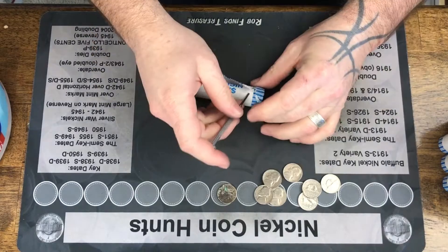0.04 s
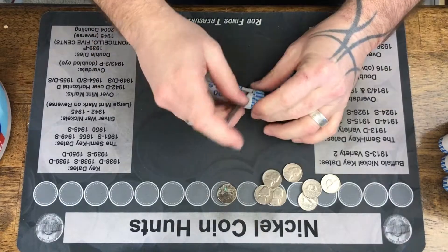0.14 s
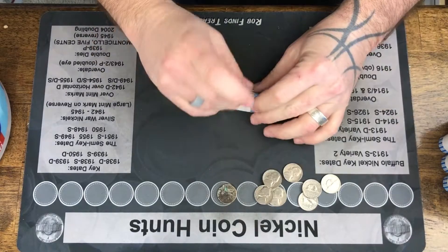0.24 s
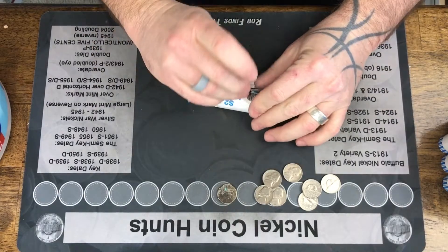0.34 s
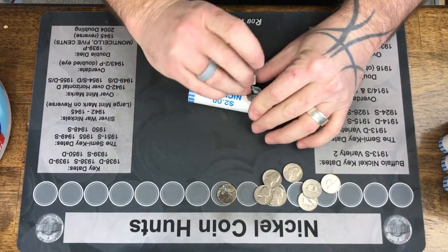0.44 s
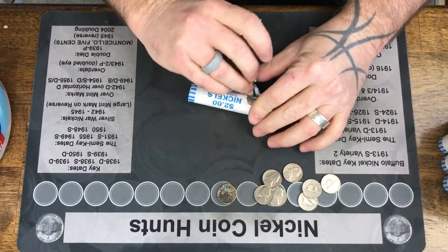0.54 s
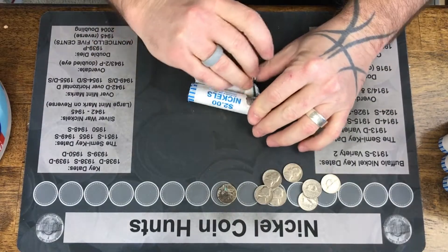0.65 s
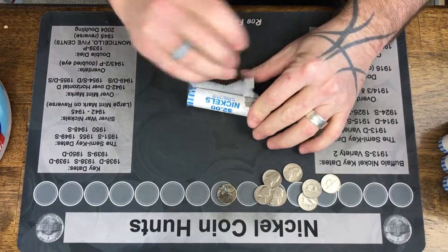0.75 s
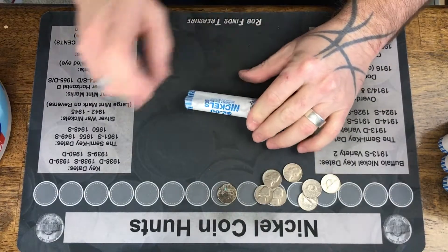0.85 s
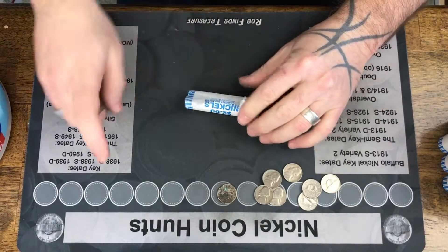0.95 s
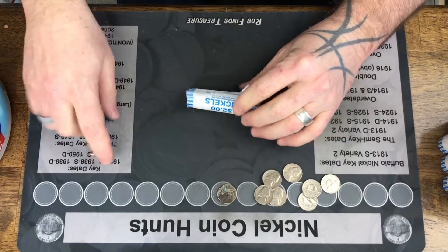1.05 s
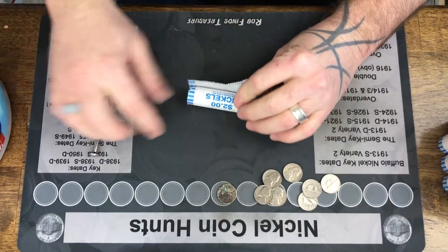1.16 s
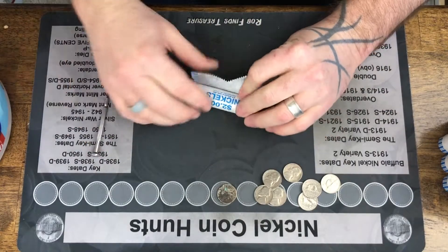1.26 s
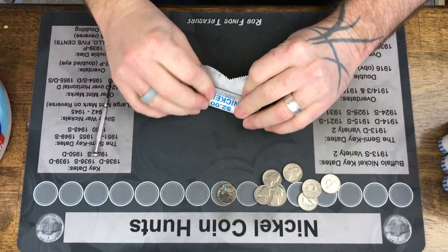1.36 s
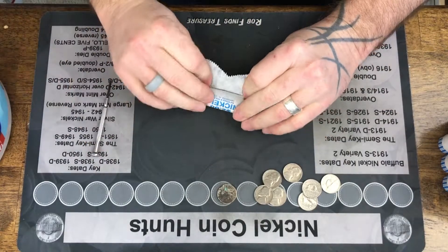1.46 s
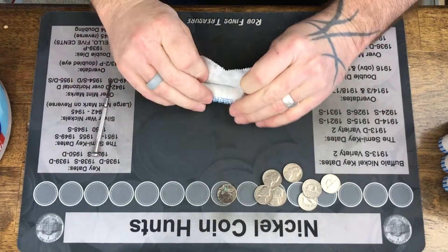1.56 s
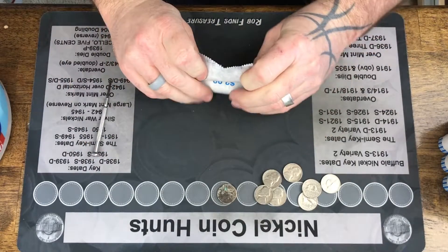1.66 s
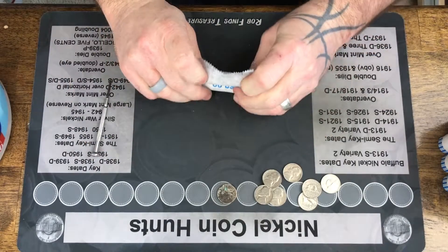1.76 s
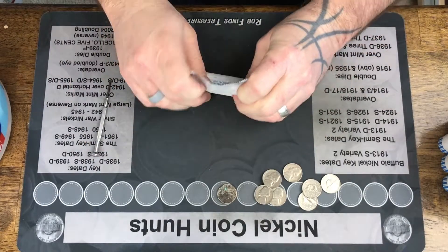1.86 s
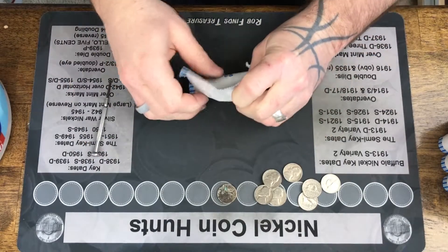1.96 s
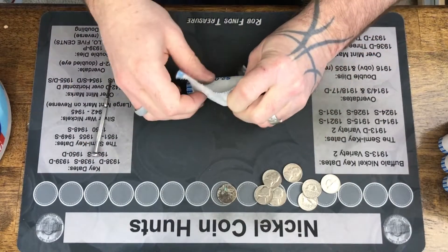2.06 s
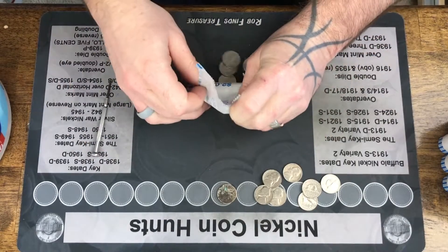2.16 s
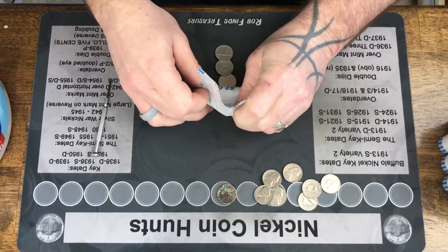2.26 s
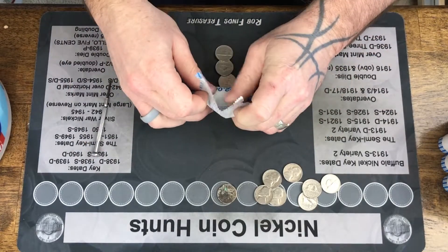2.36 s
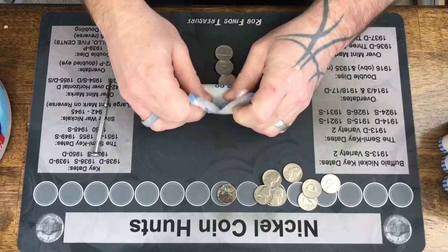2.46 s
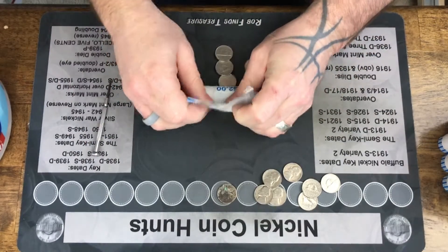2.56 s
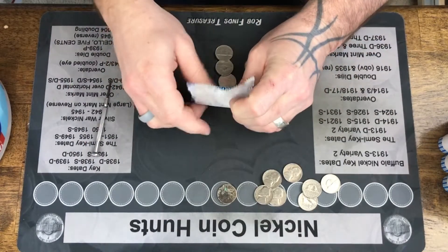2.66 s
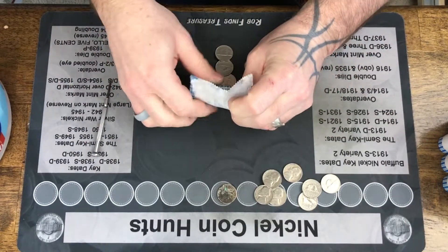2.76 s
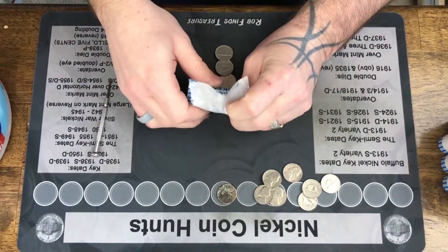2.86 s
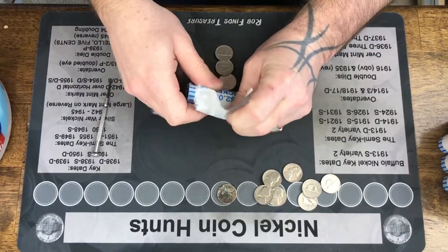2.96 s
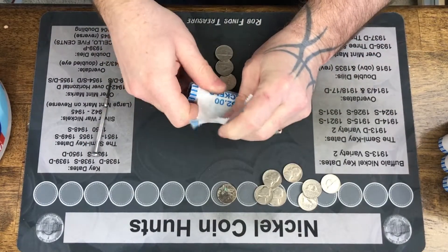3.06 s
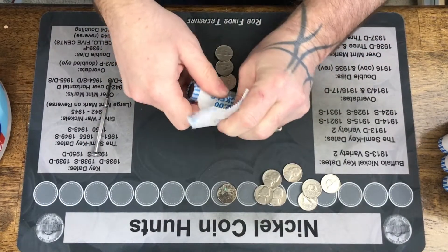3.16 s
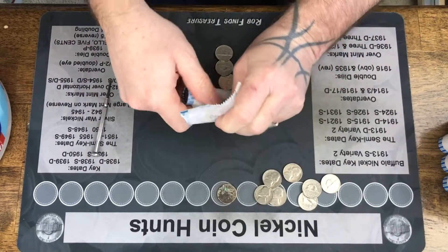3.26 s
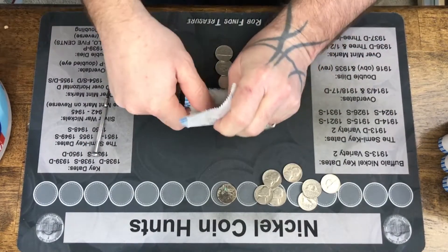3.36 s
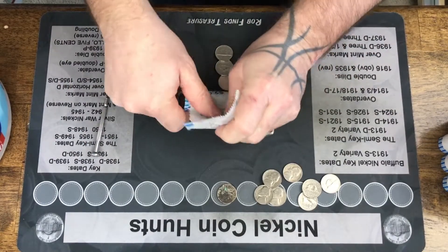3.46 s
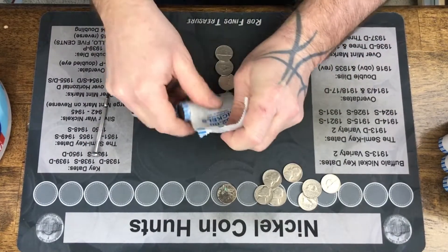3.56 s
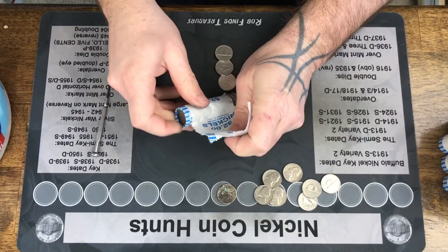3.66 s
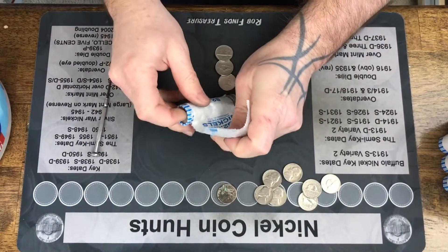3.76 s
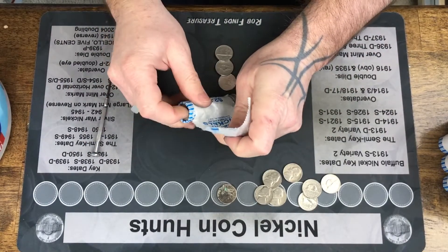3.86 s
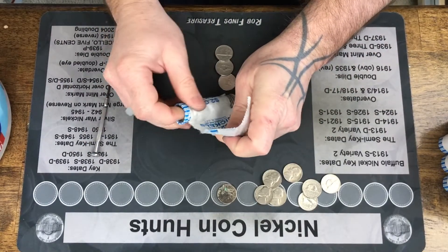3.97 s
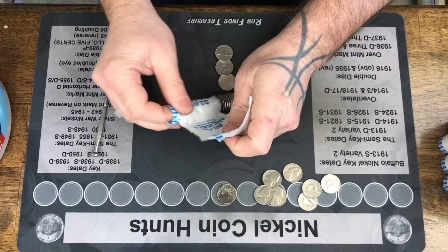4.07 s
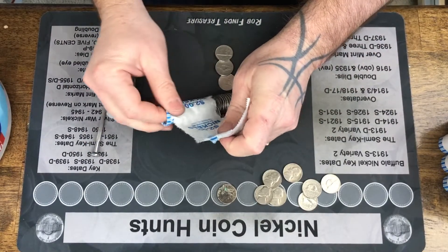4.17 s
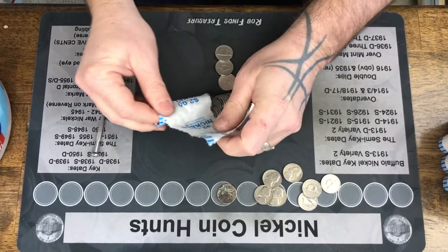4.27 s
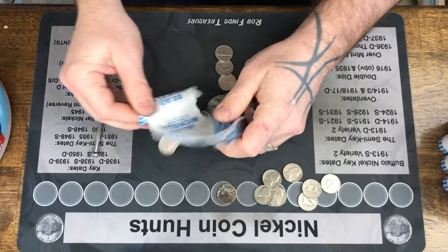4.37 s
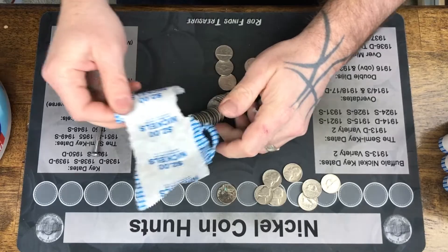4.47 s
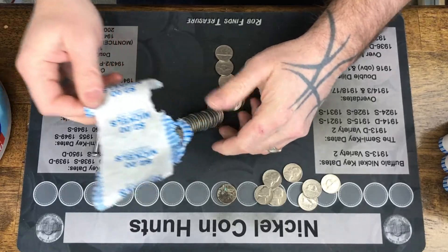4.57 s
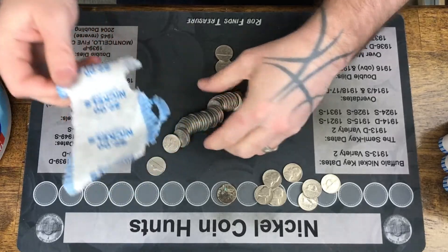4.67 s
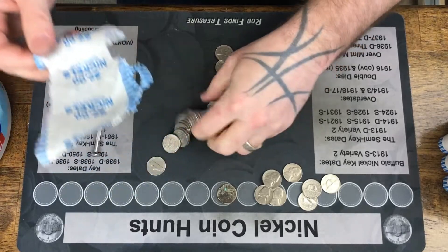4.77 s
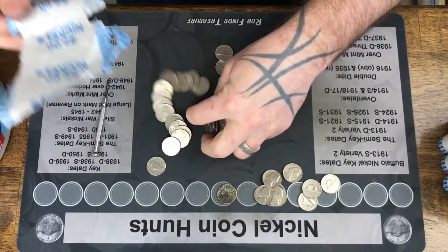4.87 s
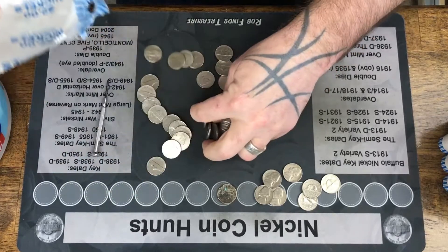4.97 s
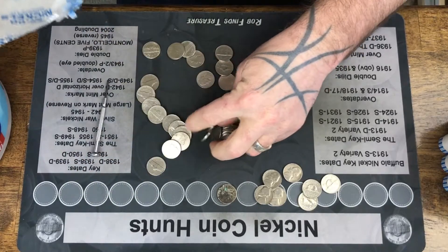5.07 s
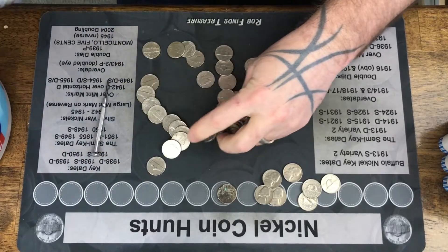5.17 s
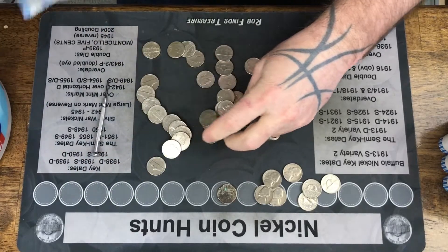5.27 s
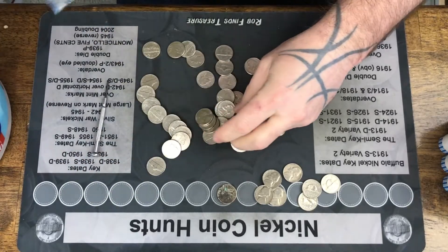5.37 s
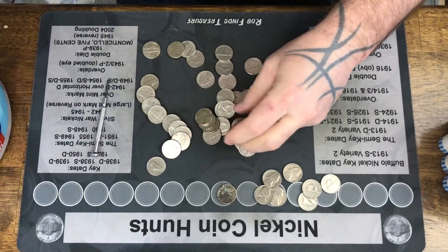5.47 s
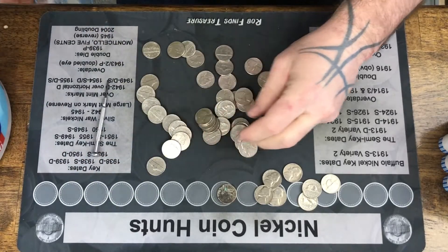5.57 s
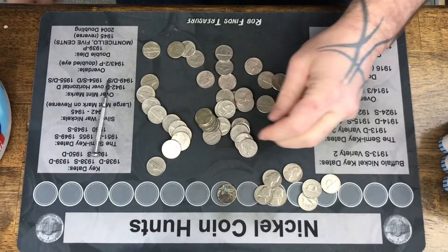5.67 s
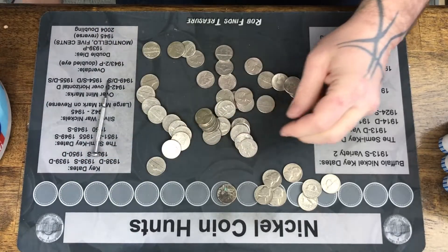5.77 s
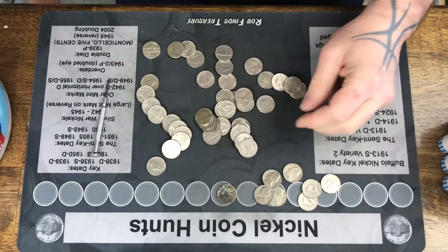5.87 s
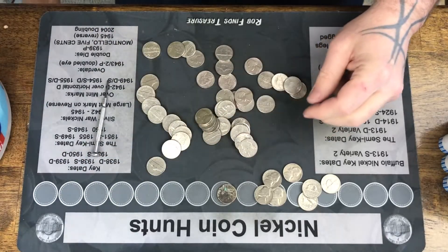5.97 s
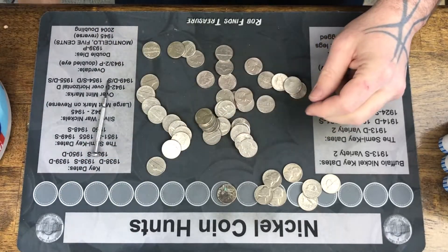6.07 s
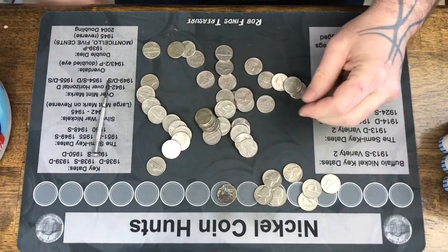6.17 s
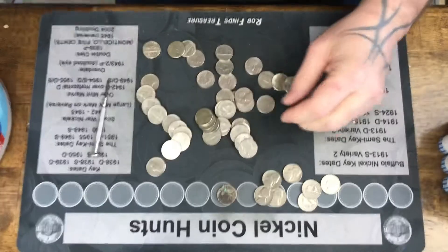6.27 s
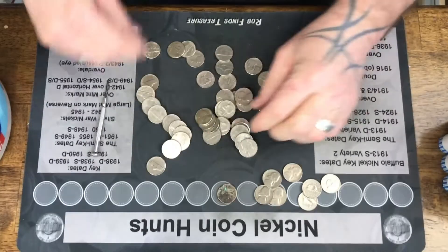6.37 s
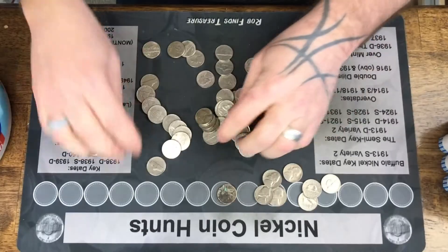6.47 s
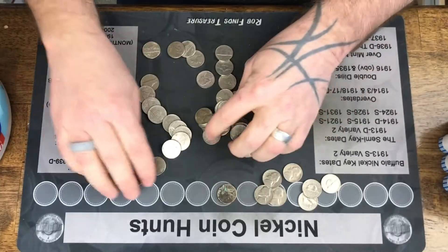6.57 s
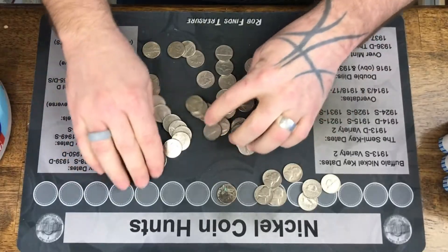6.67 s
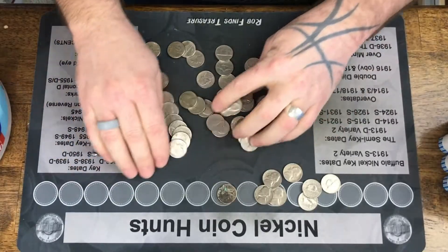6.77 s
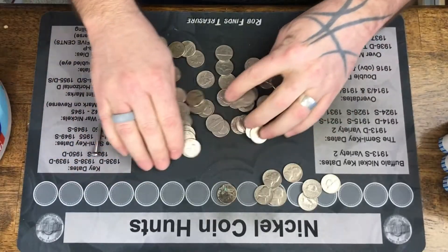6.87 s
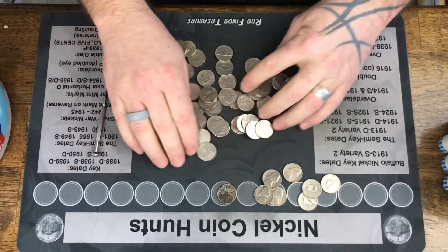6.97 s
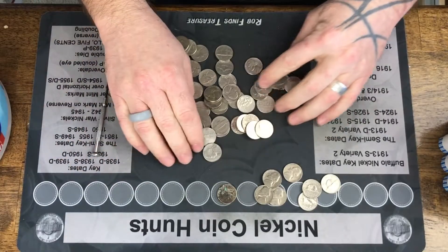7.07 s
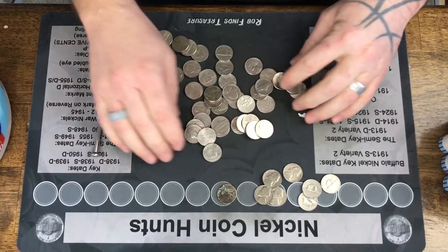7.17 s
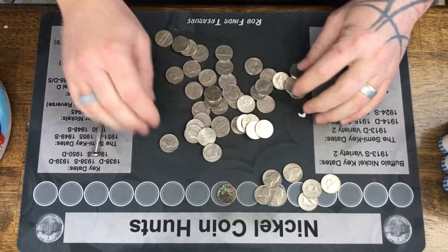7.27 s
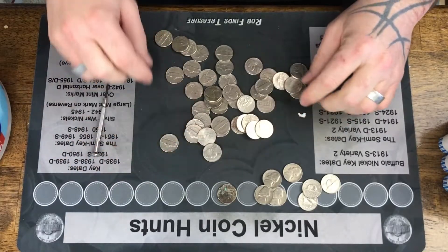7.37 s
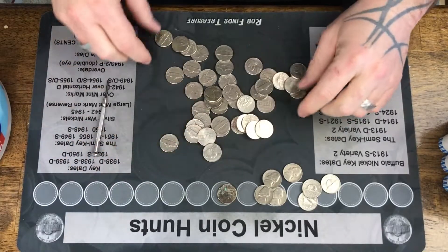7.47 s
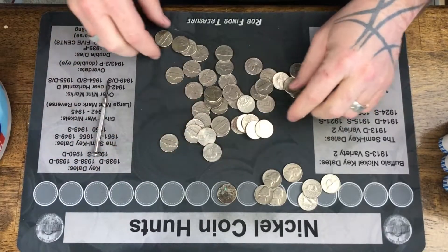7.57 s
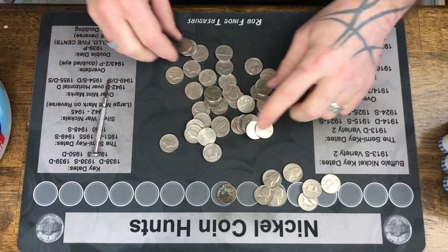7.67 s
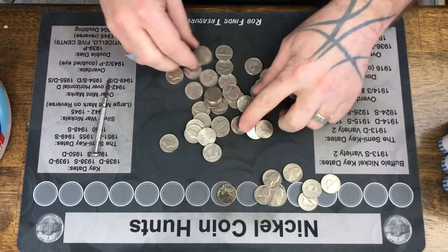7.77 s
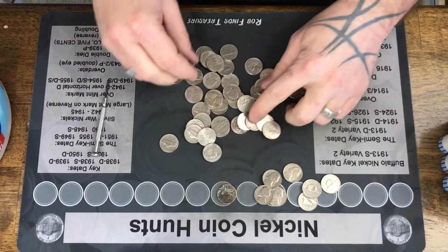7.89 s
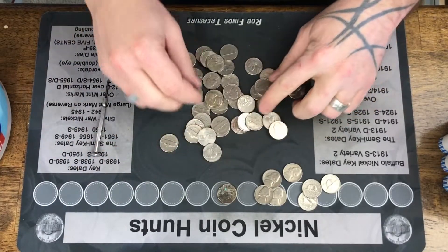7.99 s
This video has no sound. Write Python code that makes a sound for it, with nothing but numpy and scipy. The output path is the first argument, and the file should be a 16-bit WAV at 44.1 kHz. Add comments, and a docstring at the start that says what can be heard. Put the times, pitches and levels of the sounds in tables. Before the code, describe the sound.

Dry paper snaps and crackles grow into tearing, followed by high metallic jingling as loose coins tumble out and are pushed around a mat.

```python
"""Coin roll torn open

Hands pick at a paper roll of nickels and tear it open over a rubber mat on a wooden table, close by in a
small quiet room. The wrapper snaps, crinkles and rips: noise bursts, brief panel notes and ringing facets.
Coins spill and are spread over the mat: high struck modes ring, stick-slip grains scrape and drag.
Drops clack on the mat and thud through the table's modes, over a faint bed of coloured noise."""
import sys
import numpy as np
from scipy import signal
from scipy.fft import rfft, irfft
from scipy.io import wavfile
from scipy.ndimage import uniform_filter1d

SR = 44100
rng = np.random.default_rng(int(sys.argv[2]) if len(sys.argv) > 2 else 0)


def transcribe(u):
    """Save the signal u as a 16-bit wav file named by the first command-line argument.

    u: samples, shape (n,) or (channels, n), limited to [-1, 1]; the rate is SR.
    q: integer samples, one column per channel.
    """
    v = np.clip(np.atleast_2d(u).T, -1, 1)
    q = np.round(v * 32767).astype(np.int16)
    wavfile.write(sys.argv[1], SR, q)


N = 354021
TIME = np.arange(N) / SR

# Event and mode levels are relative: each layer sets its own balance on top of them.
# loud snaps of the wrapper as it is torn and then put aside:
# start_s, level_db, brightness_db (fibre hiss over panel note), panel_pitch_hz
WRAPPER_SNAPS = [(0.2104, -45, 14.5, 620), (0.2968, -40, 14, 1920), (0.4282, -39.5, 30, 1140),
                 (0.458, -40, 34, 1430), (0.4786, -38, 30, 1930), (0.4947, -39, 28, 1850),
                 (0.5218, -36.5, 8.5, 1790), (0.554, -39, 3.5, 1190), (0.585, -39.5, 13, 1130),
                 (0.6241, -44, 18, 1890), (0.6509, -43, -6, 1250), (0.769, -49.5, -10, 1390),
                 (0.8055, -36.5, 12.5, 1360), (1.0043, -52, 14, 1290), (1.2356, -43, 6.5, 1530),
                 (1.273, -40.5, 10, 2080), (1.2911, -46, 4.5, 583), (1.3238, -52, -4, 1790),
                 (1.3284, -33, 5.5, 1720), (1.413, -53.5, -6, 1270), (1.4538, -43, 9.5, 1860),
                 (1.6859, -30.5, 9, 1770), (1.7271, -29, 15.5, 1065), (1.7742, -39, 27, 1300),
                 (1.838, -37, 26, 1720), (1.8775, -40, 20, 2240), (1.9316, -34.5, 12.5, 2140),
                 (1.9618, -35, 9, 1470), (1.9797, -28, 4, 2320), (2.0722, -25, 2, 930),
                 (2.1342, -35.5, -3, 2360), (2.168, -34.5, 0, 1990), (2.4591, -37.5, 1, 1900),
                 (2.5037, -34.5, -4, 1680), (2.535, -28.5, 4.5, 1890), (2.54, -34.5, 0, 1580),
                 (2.5928, -44.5, 1, 1690), (2.6291, -46, -9, 1940), (2.6611, -40.5, 15, 1970),
                 (2.691, -40, 8.5, 1920), (2.724, -42, 2.5, 2550), (2.7455, -36, 5.5, 2400),
                 (2.8405, -32.5, 15, 2400), (2.879, -41.5, 10, 2340), (2.914, -38, 11.5, 2410),
                 (2.9833, -39.5, -3, 2160), (3.0525, -32, 1, 1670), (3.058, -36, -2, 1680),
                 (3.0866, -25, 15, 1780), (3.1318, -27.5, 2, 1650), (3.187, -30.5, 10, 2326),
                 (3.206, -31, 23, 1950), (3.2332, -35.5, 4.5, 1725), (3.2689, -24, 7, 913),
                 (3.2925, -37, -8.5, 1670), (3.3019, -30, -1, 1930), (3.3331, -38, 1, 950),
                 (3.3472, -35, -2, 1870), (3.3615, -32, 1.5, 1700), (3.3721, -23.5, 11.5, 1420),
                 (3.419, -31.5, 0, 2415), (3.4415, -37, -2, 2550), (3.486, -38, 1, 1700),
                 (3.507, -38.5, 12, 1397), (3.574, -36, 0, 2040), (3.586, -39, 14, 1230),
                 (3.643, -46, -3, 2370), (3.7847, -37.5, -0.5, 1480), (3.8114, -39.5, -1, 1710),
                 (3.822, -52, -5, 1480), (3.8456, -39, -7, 1490), (3.9217, -40.5, 6, 1680),
                 (3.9325, -42, -16, 1400), (3.9626, -44.5, 11, 1110), (3.9933, -37.5, 7.5, 2000),
                 (4.0618, -29.5, 15, 806), (4.0824, -31.5, 12.5, 1940), (4.1043, -38, -1, 1630),
                 (4.1275, -35, -1, 1440), (4.1827, -33.5, 11, 1400), (4.276, -29.5, 32, 1390),
                 (5.4281, -34.5, 10, 1620), (5.5525, -37.5, 12, 1510), (5.6324, -40, -19, 1270)]
# coin against coin: start_s, pitch_hz, ring_db, t60_s, tick_db
COIN_CLINKS = [(2.052, 14100, -30, .14, -47), (2.136, 11900, -33, 0.15, -35),
               (2.1874, 15000, -29, .14, -51), (2.202, 15000, -31, 0.13, -55),
               (2.228, 12230, -33, 0.099, -58), (4.2886, 13000, -30.5, .03, -36),
               (4.366, 14780, -30, .055, -33.5), (4.4194, 13100, -30.5, 0.16, -33),
               (4.4547, 14400, -31.5, .16, -58), (4.901, 12700, -26, 0.052, -39),
               (4.916, 14650, -28, .04, -47), (5.0986, 14460, -37, .04, -41), (5.133, 12100, -33, .11, -54),
               (5.1565, 14700, -25, .076, -51), (5.212, 12520, -41, .05, -42),
               (5.2185, 12590, -37, .05, -38), (5.2398, 12900, -33, .054, -34),
               (5.3056, 15200, -33, .042, -37), (5.362, 14600, -37.5, .06, -64),
               (5.608, 12780, -45, .048, -40), (5.673, 14730, -51, .05, -52),
               (5.8493, 12660, -71, .05, -44.5), (6.6484, 12500, -52, .04, -50),
               (6.697, 14980, -38, .04, -40.5), (6.755, 13400, -29.5, .047, -47),
               (6.7815, 11960, -32.5, 0.3, -56), (6.848, 13020, -44, .04, -31.5),
               (6.904, 12300, -38, .14, -43), (6.9509, 14360, -32.5, 0.049, -39),
               (6.9992, 13400, -34, .06, -38.5), (7.0383, 14950, -31, .067, -35),
               (7.1166, 13200, -40, .11, -40.5), (7.1794, 12900, -35, .086, -47),
               (7.2908, 13400, -53, 0.054, -49.5), (7.5546, 15000, -71, .04, -54),
               (7.711, 15090, -36, .05, -48), (7.7549, 11960, -39, .045, -37.5),
               (7.8044, 12860, -28, .044, -37), (7.82, 14440, -23.5, .08, -32),
               (7.884, 14400, -26, .08, -38), (7.8983, 14500, -31, 0.063, -38)]
# roll, coins and hands landing on the mat: start_s, thud_pitch_hz, thud_db, clack_db
MAT_KNOCKS = [(1.0073, 158, -54, -53), (1.09, 315, -47.5, -40), (1.14, 364, -48.5, -50),
              (1.1826, 318, -56, -56.5), (1.33, 536, -52, -54), (2.047, 220, -47.5, -43),
              (2.1198, 390, -56, -45), (2.2286, 219, -53, -47), (2.5348, 164, -48, -35),
              (4.422, 227, -51.5, -42), (4.4791, 330, -49.5, -40), (4.495, 200, -54, -45.5),
              (4.908, 180, -54, -46), (4.9531, 300, -58, -48), (4.9725, 230, -59, -45.5),
              (5.1011, 205, -52, -68), (5.3577, 370, -47.5, -36.5), (5.6335, 353, -51, -39.5),
              (5.6732, 310, -52.5, -48.5), (6.2533, 610, -53, -59.5), (7.5135, 200, -59, -58),
              (7.8203, 242, -55.5, -51), (7.884, 166, -56.5, -60)]
# soft bumps against the table: start_s, thud_pitch_hz, thud_db, sway_db
TABLE_BUMPS = [(2.535, 161, -48, -62), (6.254, 333, -42.5, -55.5)]
# modes of the table top: pitch_hz, level_db, t60_s
TABLE_TOP_MODES = [(134, -1, 0.062), (169.2, 0, 0.06), (208, -0.5, 0.062), (227, -2.5, 0.06),
                   (338, 0, 0.085), (376.4, -4, 0.1), (541.5, -10, 0.16), (670, -10, 0.06)]
# lowest bending modes of the loose coins: pitch_hz, level_db
COIN_BENDING_MODES = [(11940, 4), (12020, -4.5), (12400, -1), (12650, -8), (12790, 3.5), (12900, -1.5),
                      (13020, 1), (13390, -2.5), (13600, -2), (13860, -4), (14130, -11), (14340, 0.5),
                      (14440, -0.5), (14650, -2.5), (14800, 1), (15020, -8), (15390, 1)]
# rubs and rips of the wrapper: start_s, length_s, fibre_crackle_db, sheet_flutter_db, swell_db (over the length)
WRAPPER_RUBS = [(0.02, 0.21, -72.5, -75.5, -4), (0.22, 0.25, -66, -74.5, 6), (0.5, 0.093, -53.5, -70, 0),
                (0.61, .195, -52.5, -61.5, 6.5), (0.94, 0.018, -55, -62.5, 3.5),
                (1.01, 0.085, -64, -63, -5), (1.24, 0.22, -65.5, -72, -11), (1.455, 0.18, -47, -58, 2.5),
                (1.675, 0.055, -38.5, -51, -3.5), (1.745, 0.056, -50, -60, -4.5),
                (1.955, 0.022, -31, -37, 1.5), (2.0, 0.17, -50.5, -49.5, 10.5), (2.47, .075, -45, -45.5, 7),
                (2.56, 0.059, -52.5, -53, 7), (2.745, 0.043, -45.5, -55.5, -6),
                (2.79, 0.058, -40, -55.5, -2), (3.06, 0.03, -35.5, -34.5, 3),
                (3.205, 0.044, -40, -46.5, -10), (3.295, 0.08, -36.5, -41, 1.5),
                (3.39, 0.097, -41, -43, -2.5), (3.58, 0.085, -49.5, -51.5, -3.5),
                (3.79, 0.066, -59, -48.5, -6), (3.97, 0.071, -45.5, -45.5, 3.5),
                (4.06, 0.068, -34, -37.5, 0.5), (4.15, .12, -53.5, -57.5, 4), (4.28, 0.19, -56, -58.5, -6),
                (5.22, 0.28, -51.5, -57.5, -5.5), (5.53, 0.083, -47, -59, -2.5)]
# the wrapper rustles faintly in the grip all through the tearing:
# start_s, length_s, fibre_crackle_db, sheet_flutter_db, swell_db
GRIP_RUSTLE = [(1.449, 2.85, -61.5, -63.5, 5.5)]
# pushes that slide coins over each other: start_s, length_s, ring_db, scrape_db, swell_db
COIN_PUSHES = [(2.045, 0.18, -31, -50, 4.5), (2.34, .04, -73, -60.5, -7), (4.3, 0.038, -51, -54, 12),
               (4.365, 0.087, -36.5, -47, -12), (4.475, 0.029, -44, -47.5, -6),
               (4.55, 0.083, -75, -69.5, 0), (4.828, .047, -40, -47, 0), (4.89, 0.082, -28.5, -40.5, -6),
               (4.99, 0.16, -45.5, -54, -2), (5.14, 0.11, -36, -45.5, -5), (5.27, 0.2, -64, -57, 4),
               (5.55, 0.064, -45, -60, -4), (5.855, 0.034, -75, -60, -10), (5.98, 0.16, -78, -71.5, -2),
               (6.255, .01, -76, -62, -4), (6.67, 0.061, -41.5, -45.5, 7), (6.755, .1, -32.5, -41, -1),
               (6.87, 0.072, -46, -48.5, 7), (6.955, .11, -39, -45, 1.5), (7.09, .18, -54, -55, -3),
               (7.56, 0.12, -73, -66, 1), (7.705, 0.077, -42, -46, 5), (7.822, .078, -35, -41.5, -6.5),
               (7.93, 0.072, -59, -56, 2)]
# hands and coins dragging slowly over the mat: start_s, length_s, level_db, swell_db
MAT_DRAGS = [(4.3, 0.2, -57.5, -2.5), (4.61, 0.02, -70, 3), (4.85, 0.793, -62, 4.5), (5.75, 0.36, -70, 1),
             (6.3, .3, -81.5, -9.5), (6.72, 0.32, -56.5, 0.5), (7.07, 0.19, -65, 0), (7.56, 0.099, -72, -2),
             (7.72, 0.15, -62, -1), (7.96, 0.076, -67.5, 0)]
# fingertips and paper skimming over taut paper: start_s, length_s, level_db, swell_db
PAPER_BRUSHES = [(.31, 0.088, -57.5, 2), (.45, .05, -50, 9), (.51, 0.14, -52, 0), (1.25, 0.022, -60, -3),
                 (1.47, 0.22, -45.5, 10), (1.68, 0.058, -35.5, 0), (2.795, 0.05, -39, -3),
                 (3.21, 0.013, -44, -0.5), (3.585, 0.03, -53, -9), (4.28, 0.012, -37, -3)]

# Colours: each spectrum only shapes, the filter keeps overall power.
# paper fibres tearing: frequency_hz, level_db
FIBRE_COLOUR = [(500, -24), (1500, -16), (2600, -3), (3700, 1.5), (4800, -3.5), (6200, 6), (7600, -3.5),
                (9300, 2.5), (10600, -3), (13000, 2), (16000, -6)]
# paper sheet flapping: frequency_hz, level_db
SHEET_COLOUR = [(150, -23), (420, -30), (620, 2), (850, 4), (1250, 6.5), (1700, 8), (2400, 2.5), (3600, 4),
                (7000, -59)]
# finest fibres hissing: frequency_hz, level_db
HISS_COLOUR = [(2000, -47.5), (5500, -11.5), (7500, -6.5), (9300, 2), (10800, -5), (13000, 0), (16000, -8)]
# coin rims scraping and ticking: frequency_hz, level_db
SCRAPE_COLOUR = [(400, -52.5), (1500, 0.5), (2500, -8), (3700, -5.5), (4900, -7), (6600, 4.5), (9300, 4.5),
                 (10600, -1), (12500, -8), (16000, 1)]
# dull clack of a drop on the mat: frequency_hz, level_db
CLACK_COLOUR = [(200, -17.5), (450, -8), (700, -0.5), (1300, 5), (1900, -2.5), (2600, -7.5), (3600, -9),
                (5500, -25.5), (12000, -46)]
# friction over the mat: frequency_hz, level_db
DRAG_COLOUR = [(200, -10), (480, -11), (750, -6.5), (1400, -0.5), (1900, -5), (2600, -7), (3700, -8.5),
               (6000, -8), (12000, -24)]
# still air of the room: frequency_hz, level_db
AIR_COLOUR = [(15, -22.5), (28, -17), (50, -6.5), (90, -9.5), (180, -14.5), (330, -20.5), (500, -21.5),
              (1400, -33), (3000, -35.5), (7000, -37.5), (16000, -42)]
# noise of coins jolting each other: frequency_hz, level_db
CHATTER_COLOUR = [(9000, -26.5), (12200, 1.5), (15500, -6)]
# reflections from the walls: frequency_hz, level_db
WALL_COLOUR = [(100, 13.0), (1500, 4.5), (5000, 3.5), (10000, -12.5), (16000, -6.5)]

AIR_DB, CUTOFF_HZ = -69, 15900
SWAY_HZ, SWAY_T60_S = 51.5, 0.49
CRACK_HZ, CRACK_OCTAVES_PER_DB = 3700, .052  # a brighter snap cracks higher
CRACK_DB, PANEL_DB, FLAP_DB, HISS_DB = 0, -2, -1, -0.5  # parts of a snap, against its level
CRACK_LOSS = 0.075  # dB of crack lost for each dB of brightness: fibres parting alone hardly crack
FIRST_SLIP_S, FIRST_SLIP_DB = 0.0039, -13  # typical lead: a crease slips a little before it gives way
SMALL_SNAPS_PER_S = 16
SMALL_SNAP_DB, SMALL_SNAP_SPREAD_DB = 0.5, 3.5  # against the crackle level of the moment
SMALL_BRIGHT_DB, SMALL_BRIGHT_SPREAD_DB = 7.5, 8
SMALL_PANEL_HZ = 1770  # centre, drawn up to half an octave either way
RUB_ATTACK_DB_PER_S, RUB_RELEASE_DB_PER_S = 851.5, 521.5
PUSH_ATTACK_DB_PER_S, PUSH_RELEASE_DB_PER_S = 1000, 520
DRAG_ATTACK_DB_PER_S, DRAG_RELEASE_DB_PER_S = 178, 149
BRUSH_ATTACK_DB_PER_S, BRUSH_RELEASE_DB_PER_S = 1099, 705


def from_db(db):
    """Decibels to gain."""
    return 10 ** (np.asarray(db) / 20)


def unit_energy(x):
    """Scale so that the squares sum to one."""
    return x / np.sqrt(np.sum(x ** 2) + 1e-20)


def fade(t60):
    """An exponential decay, followed down to -60 dB."""
    return from_db(-60 * TIME[:int(t60 * SR) + 2] / t60)


def tone(hz, t60):
    """One struck mode: a decaying sine."""
    decay = fade(t60)
    return decay * np.sin(2 * np.pi * hz * TIME[:len(decay)])


def through(x, response):
    """Pass a sound through an impulse response."""
    return signal.oaconvolve(x, response)[:len(x)]


def coloured(x, spectrum, size=2048):
    """Causal (minimum-phase) filter that keeps the power of white noise."""
    hz, db = np.transpose(spectrum)
    bin_hz = np.arange(size // 2 + 1) * SR / size
    shape_db = np.interp(np.log(bin_hz + 1), np.log(hz), db)
    # folding the cepstrum forward in time gives minimum phase
    cepstrum = irfft(np.log(from_db(shape_db)))
    cepstrum[1:size // 2] *= 2
    response = irfft(np.exp(rfft(cepstrum[:size // 2], size)))
    return through(x, unit_energy(response))


def evened(x, span):
    """Hold the rms near one over a span of seconds, leaving the finer grain."""
    width = int(span * SR)
    power = uniform_filter1d(uniform_filter1d(x ** 2, width), width)
    return x / np.sqrt(np.maximum(power, 0) + 1e-6 * np.mean(x ** 2))


def resonant(x, hz, q):
    """A broad resonance with gain one at its centre."""
    return signal.lfilter(*signal.iirpeak(min(hz, .4 * SR), max(q, 1), fs=SR), x)


def ringing(x, hz, t60):
    """One mode driven by a signal; a unit impulse gives about unit energy."""
    radius = from_db(-60 / (t60 * SR))
    angle = 2 * np.pi * hz / SR
    gain = np.sqrt(2 * (1 - radius * radius)) * np.sin(angle)
    return signal.lfilter([gain], [1, -2 * radius * np.cos(angle), radius * radius], x + 1e-18)


def add(track, s, sound, db, span):
    """Place a sound whose energy equals db of rms lasting span seconds."""
    at = int(s * SR)
    part = unit_energy(sound)[:N - at]
    track[at:at + len(part)] += from_db(db) * np.sqrt(span * SR) * part


def burst(t60, tail_db, tail_t60):
    """A contact: noise that dies at once, with a weaker, longer tail."""
    t = TIME[:SR // 10]
    onset = from_db(-60 * t / t60)
    tail = from_db(tail_db - 60 * t / tail_t60)
    return rng.standard_normal(len(t)) * (onset + tail)


def slips(per_s, spread_db):
    """Random stick-slip impulses, mostly small and a few large."""
    when, size = rng.random((int(per_s * N / SR), 2)).T
    impulses = np.zeros(N)
    impulses[(when * N).astype(int)] = from_db(spread_db * np.minimum(-np.log1p(-size), 4.5))
    return impulses


def grains(impulses, t60):
    """Each impulse sets off a tiny noise burst of its own."""
    return through(impulses, fade(t60)) * rng.standard_normal(N)


def pops(per_s, spread_db, low_hz, high_hz, cycles, count=20):
    """Each slip rings one of a set of small facets, which decays within a given number of cycles."""
    pitches = np.geomspace(low_hz, high_hz, count)
    # higher facets cover more bandwidth, so they carry more energy
    return sum(np.sqrt(hz) * ringing(slips(per_s / count, spread_db), hz, cycles / hz) for hz in pitches)


def strokes(rows, attack_db_per_s, release_db_per_s):
    """Strokes of the hand rise, swell or ease, then die; one gain curve for each level column."""
    t, power = TIME[::32], 0
    for s, length, *levels_db, swell_db in rows:
        held_db = swell_db * (np.clip((t - s) / length, 0, 1) - .5)
        rise_db = attack_db_per_s * np.maximum(s - t, 0)
        fall_db = release_db_per_s * np.maximum(t - s - length, 0)
        curve_db = held_db - np.minimum(rise_db + fall_db, 120)
        power = power + from_db(np.add.outer(levels_db, curve_db)) ** 2
    return [np.interp(TIME, t, np.sqrt(p)) for p in power]


def still_air():
    """The room's faint steady noise, strongest in the bass."""
    return from_db(AIR_DB) * coloured(rng.standard_normal(N), AIR_COLOUR, size=8192)


def room(x, t60, wet_db):
    """Diffuse reflections from the walls, weaker in the treble."""
    decay = fade(t60)
    late = TIME[:len(decay)] > .005
    tail = coloured(rng.standard_normal(len(decay)) * decay * late, WALL_COLOUR)
    return x + from_db(wet_db) * through(x, unit_energy(tail))


def table(force):
    """The table top's answer to blows through the mat; it radiates little below its first mode."""
    response = np.zeros(N)
    for hz, db, t60 in TABLE_TOP_MODES:
        add(response, 0, tone(hz, t60) * rng.choice([-1, 1]), db, span=t60)
    highpass = signal.butter(2, 115, "high", fs=SR, output="sos")
    response = signal.sosfilt(highpass, response[:SR // 2])
    return through(force, unit_energy(response))


def knocks():
    """The mat softens each drop to a dull clack; the table thuds beneath and sways after a bump."""
    force, give, clack, sway = np.zeros((4, N))
    for s, hz, thud_db, clack_db in MAT_KNOCKS:
        # the load bounces on the rubber for a few cycles, lower when it is heavier
        add(give, s, tone(hz, t60=13 / hz), thud_db - 5, span=0.012)
        add(force, s, tone(hz, t60=3 / hz), thud_db - 21.5, span=0.044)
        add(clack, s, burst(t60=.016, tail_db=-8, tail_t60=.055), clack_db, span=.007)
    for s, hz, thud_db, sway_db in TABLE_BUMPS:
        add(force, s, tone(hz, t60=3 / hz), thud_db - 17, span=0.019)
        add(sway, s + 0.011, tone(SWAY_HZ, SWAY_T60_S), sway_db, span=0.088)
        add(sway, s, tone(hz=78.7, t60=0.1215), sway_db, span=0.087)
    return table(force) + give + coloured(clack, CLACK_COLOUR) + sway


def sliding():
    """Rims scrape over faces, every coin rings on its own contacts, and the heap drags over the mat."""
    ring, scrape = strokes(COIN_PUSHES, PUSH_ATTACK_DB_PER_S, PUSH_RELEASE_DB_PER_S)
    push, = strokes(MAT_DRAGS, DRAG_ATTACK_DB_PER_S, DRAG_RELEASE_DB_PER_S)
    contacts = grains(slips(per_s=1500, spread_db=4.0), t60=.004)
    squeaks = pops(per_s=3000, spread_db=3.0, low_hz=4500, high_hz=15500, cycles=50)
    rasp = evened(unit_energy(contacts) + unit_energy(squeaks), span=0.14)
    chime = np.zeros(N)
    for hz, db in COIN_BENDING_MODES:
        free = ringing(slips(per_s=18, spread_db=4.0), hz, t60=.07)
        # a coin pinned under its neighbours rings off pitch and dies at once
        held_hz = hz + rng.uniform(-100, 350)
        held = ringing(slips(per_s=120, spread_db=4.0), held_hz, t60=.012)
        chime += from_db(db) * (unit_energy(free) + unit_energy(held))
    chime = signal.sosfilt(signal.butter(2, 10500, "high", fs=SR, output="sos"), chime)
    ringing_metal = from_db(-2.5) * ring * evened(chime, span=0.036)
    scraping_metal = scrape * coloured(rasp, SCRAPE_COLOUR)
    friction = evened(grains(slips(per_s=2500, spread_db=2.5), t60=.015), span=.04)
    drag = from_db(1) * push * coloured(friction, DRAG_COLOUR)
    # the heap's weight rumbles even under a light push
    rumble = from_db(-31.5) * scrape ** 0.67 * table(rng.standard_normal(N))
    return ringing_metal + scraping_metal + drag + rumble


def clinks():
    """A struck coin rings with a close pair of modes and jolts a neighbour; fingers and mat damp them soon."""
    rings, chatter, ticks = np.zeros((3, N))
    for s, hz, ring_db, t60, tick_db in COIN_CLINKS:
        neighbour_hz = COIN_BENDING_MODES[rng.integers(len(COIN_BENDING_MODES))][0]
        pair_hz = hz + rng.uniform(-260, 260)
        for mode_hz, mode_db in [(hz, -3), (pair_hz, -9), (neighbour_hz, -11)]:
            add(rings, s, tone(mode_hz, t60), ring_db + mode_db, span=0.0024 + t60 / 14)
        add(chatter, s, burst(t60=.009, tail_db=-12, tail_t60=.05), ring_db - 4, span=.008)
        add(ticks, s, burst(t60=.008, tail_db=-10, tail_t60=.022), tick_db, span=.0035)
    return rings + coloured(chatter, CHATTER_COLOUR) + coloured(ticks, SCRAPE_COLOUR)


def brushing():
    """Skimming contact catches only the finest fibres: a thin, bright, grainy hiss."""
    level, = strokes(PAPER_BRUSHES, BRUSH_ATTACK_DB_PER_S, BRUSH_RELEASE_DB_PER_S)
    catches = grains(slips(per_s=1400, spread_db=5.0), t60=.006)
    return level * coloured(evened(catches, span=0.069), HISS_COLOUR)


def rubbing():
    """How hard the fibres crackle and the sheet flutters under the fingers."""
    return strokes(WRAPPER_RUBS + GRIP_RUSTLE, RUB_ATTACK_DB_PER_S, RUB_RELEASE_DB_PER_S)


def tearing():
    """Fibres part in quick uneven runs; small facets of the sheet pop, larger ones lower and longer."""
    crackle, flutter = rubbing()
    breaks = grains(slips(per_s=2600, spread_db=3.2), t60=.007)
    facets = pops(per_s=3400, spread_db=3.4, low_hz=2200, high_hz=15500, cycles=40)
    fibres = coloured(evened(unit_energy(breaks) + unit_energy(facets), span=0.12), FIBRE_COLOUR)
    panels = pops(per_s=1300, spread_db=3.0, low_hz=500, high_hz=3600, cycles=28)
    sheet = coloured(evened(panels, span=0.056), SHEET_COLOUR)
    # the hands lean on the roll and set the table rumbling faintly
    handling = from_db(-70.0) * crackle ** .15 * table(rng.standard_normal(N))
    return from_db(-0.5) * crackle * fibres + from_db(-9.0) * flutter * sheet + handling


def small_snaps():
    """Lesser creases give way at random, louder the harder the wrapper is worked; rows as in WRAPPER_SNAPS."""
    crackle, _ = rubbing()
    when, size, bright, pitch = rng.uniform(-1, 1, (int(SMALL_SNAPS_PER_S * N / SR), 4)).T
    s = (when + 1) / 2 * TIME[-1]
    crackle_db = 20 * np.log10(np.interp(s, TIME, crackle))
    db = crackle_db + SMALL_SNAP_DB + SMALL_SNAP_SPREAD_DB * size
    bright_db = SMALL_BRIGHT_DB + SMALL_BRIGHT_SPREAD_DB * bright
    panel_hz = SMALL_PANEL_HZ * 2 ** (pitch / 2)
    return list(zip(s, db, bright_db, panel_hz))


def snaps():
    """A crease gives way: a crack, a spit of fibres, and a brief note from the freed panel."""
    panel, flap, crack, hiss = np.zeros((4, N))
    for s, db, bright_db, panel_hz in WRAPPER_SNAPS + small_snaps():
        # brightness shares the energy between the panel and the fibres
        panel_db = db - 10 * np.log10(1 + from_db(bright_db) ** 2)
        crack_hz = CRACK_HZ * 2 ** (CRACK_OCTAVES_PER_DB * bright_db)
        sharp = resonant(burst(t60=0.0073, tail_db=-7, tail_t60=0.026), crack_hz, q=1.7)
        spit = burst(t60=.004, tail_db=-11.5, tail_t60=0.01614)
        slip = burst(t60=.005, tail_db=-12, tail_t60=.016)
        slip_s = max(s - FIRST_SLIP_S * rng.uniform(.6, 1.4), 0)
        add(crack, slip_s, slip, db + FIRST_SLIP_DB, span=.0047)
        add(panel, s, tone(panel_hz, t60=20 / panel_hz), panel_db + PANEL_DB, span=.005)
        add(flap, s, burst(t60=.008, tail_db=-2, tail_t60=.035), panel_db + FLAP_DB, span=.005)
        add(crack, s, sharp, db + CRACK_DB - CRACK_LOSS * bright_db, span=.0047)
        add(hiss, s, spit, panel_db + bright_db + HISS_DB, span=.0028)
    crack = signal.sosfilt(signal.butter(2, [1800, 9000], "band", fs=SR, output="sos"), crack)
    return panel + coloured(flap, SHEET_COLOUR) + crack + coloured(hiss, HISS_COLOUR)


def scene():
    """Table, coins and wrapper in the still air of the room."""
    close = knocks() + sliding() + clinks() + brushing() + tearing() + snaps()
    return (room(close, t60=0.22, wet_db=-17.5) + still_air())[None]


def record(dry):
    """The top is cut steeply."""
    return signal.sosfilt(signal.ellip(10, .2, 70, CUTOFF_HZ, fs=SR, output="sos"), dry)


dry = scene()
out = record(dry)
transcribe(out)
```